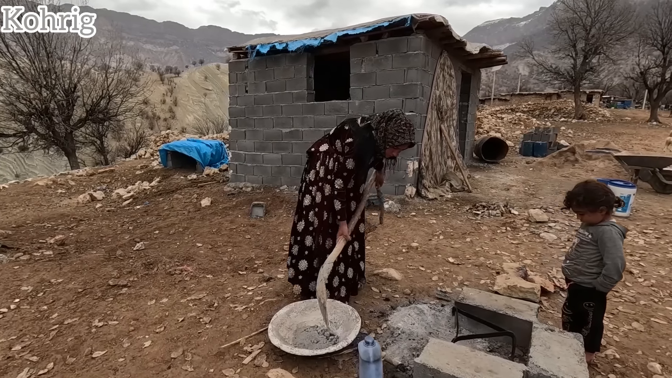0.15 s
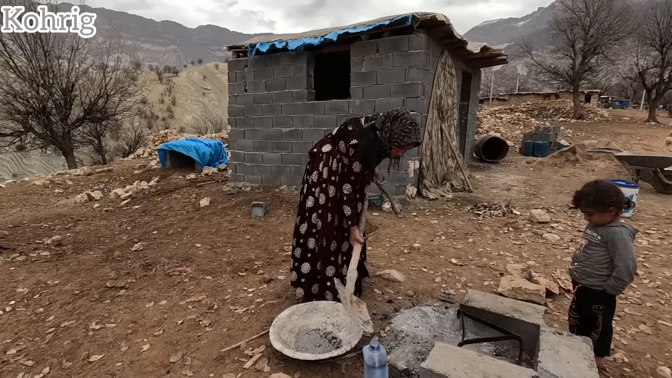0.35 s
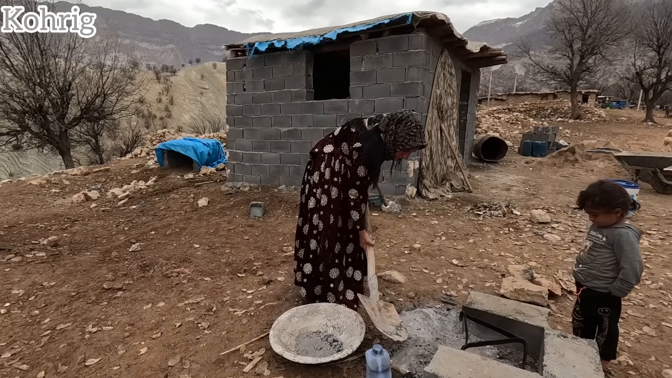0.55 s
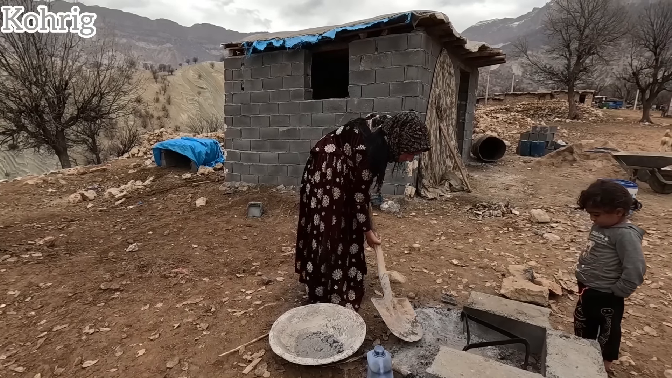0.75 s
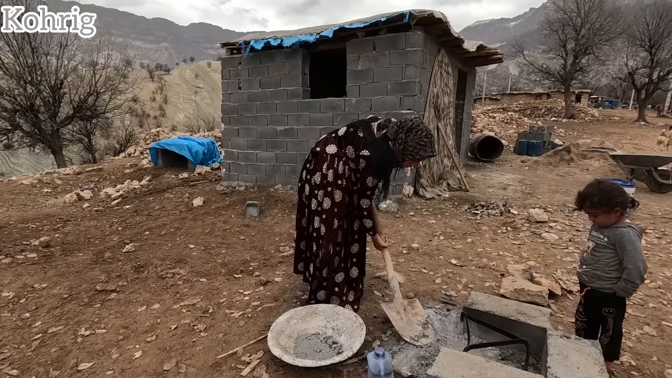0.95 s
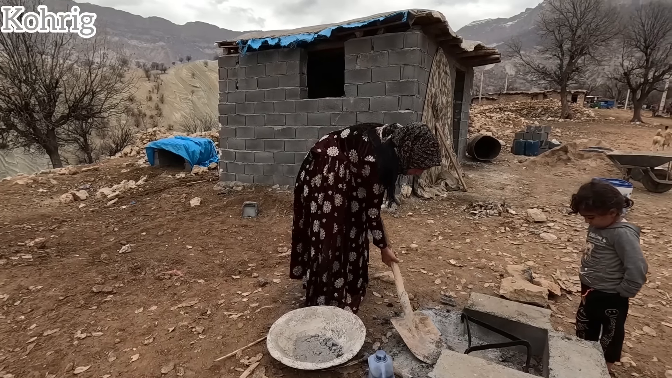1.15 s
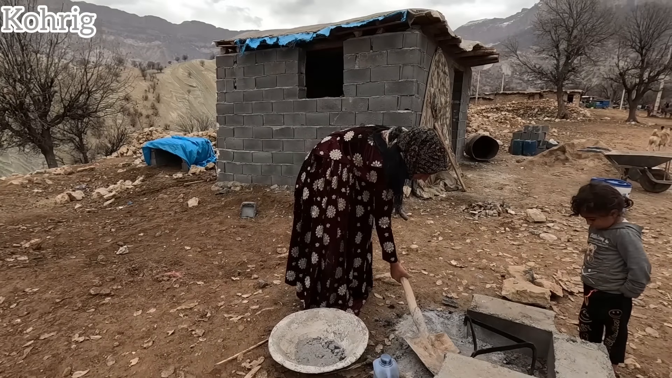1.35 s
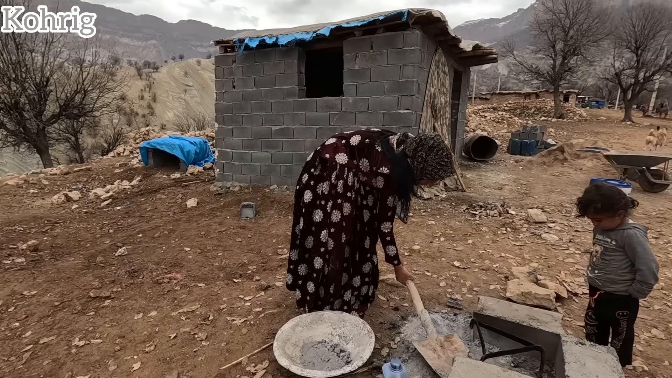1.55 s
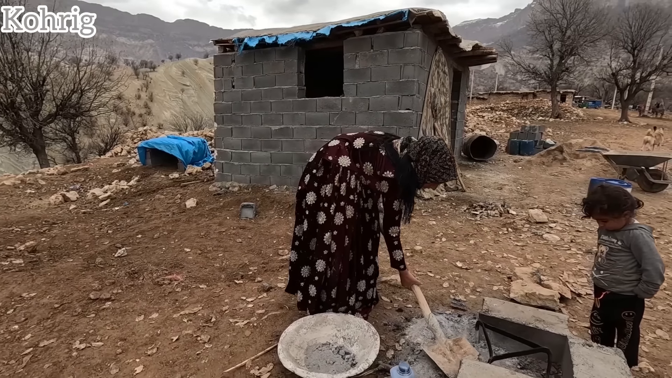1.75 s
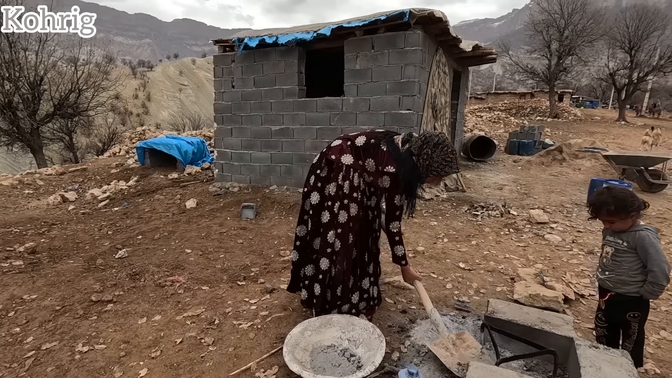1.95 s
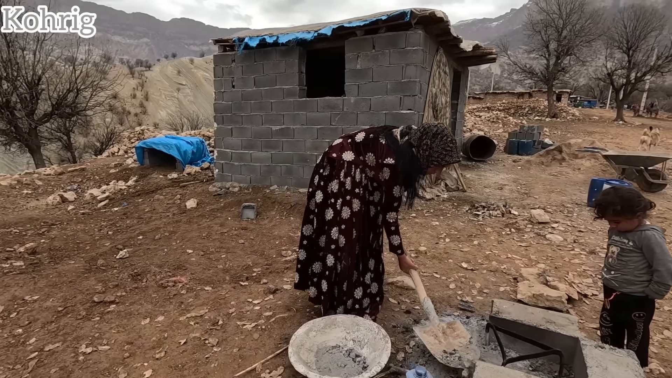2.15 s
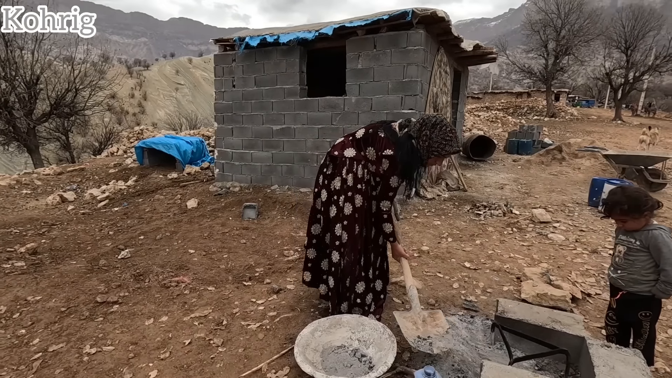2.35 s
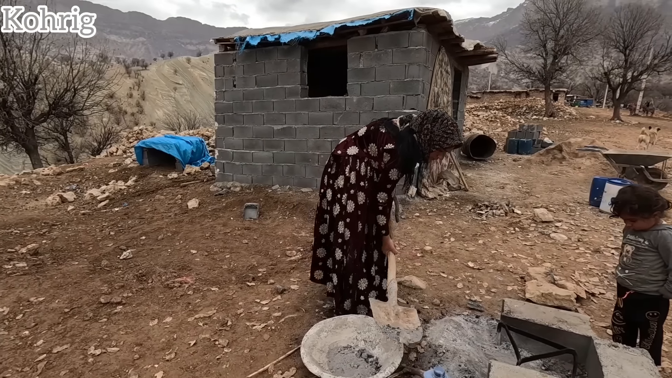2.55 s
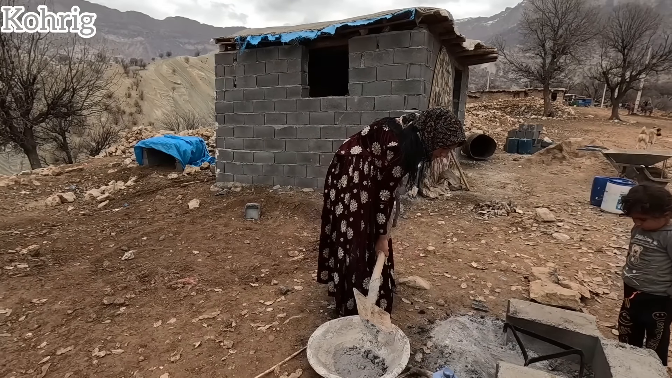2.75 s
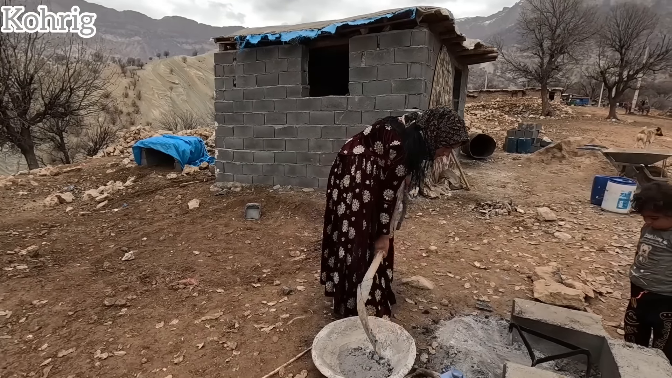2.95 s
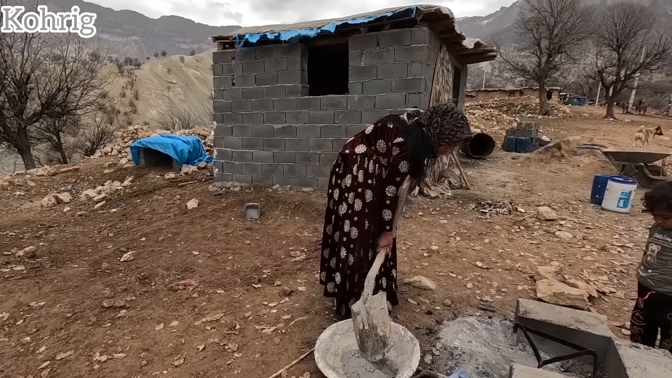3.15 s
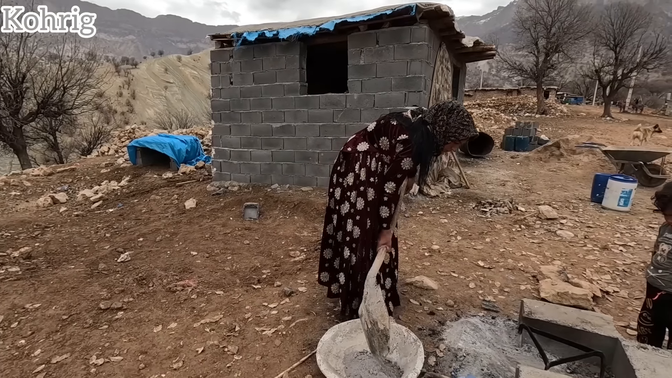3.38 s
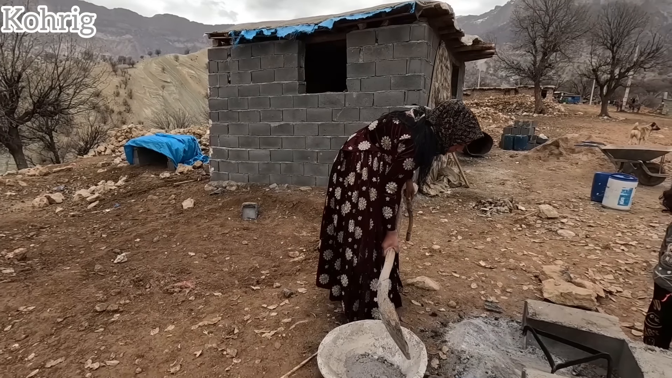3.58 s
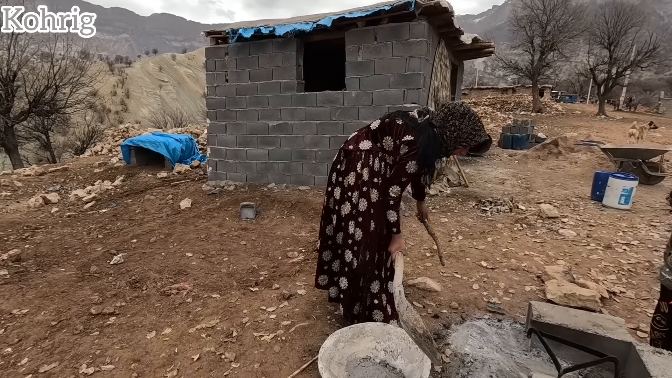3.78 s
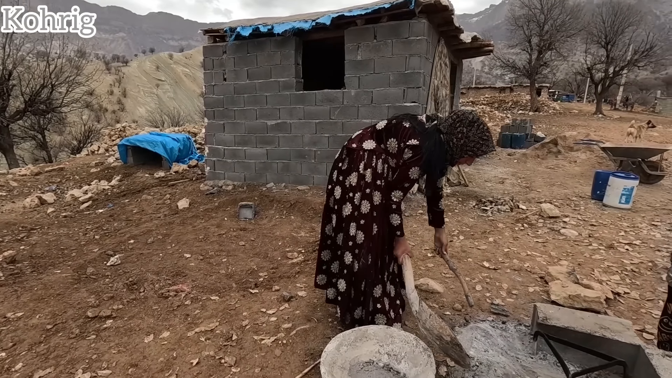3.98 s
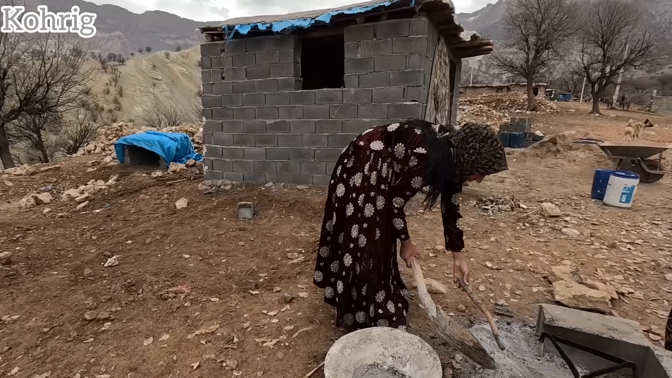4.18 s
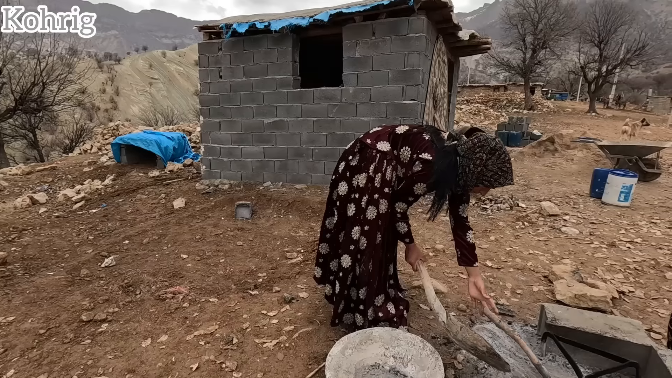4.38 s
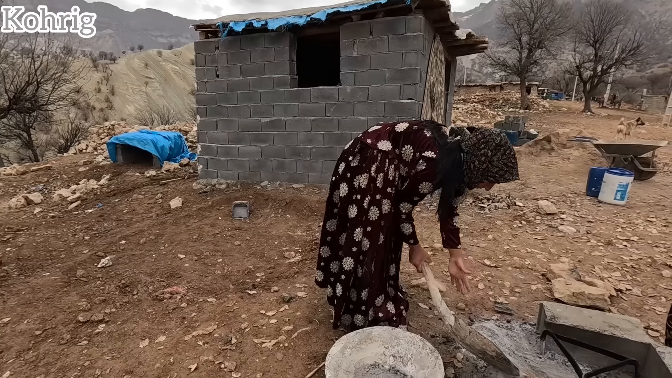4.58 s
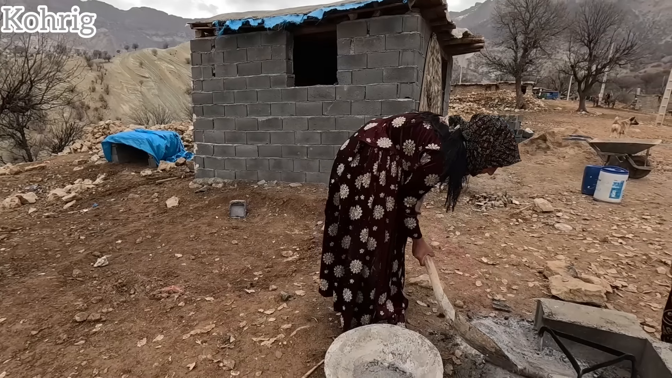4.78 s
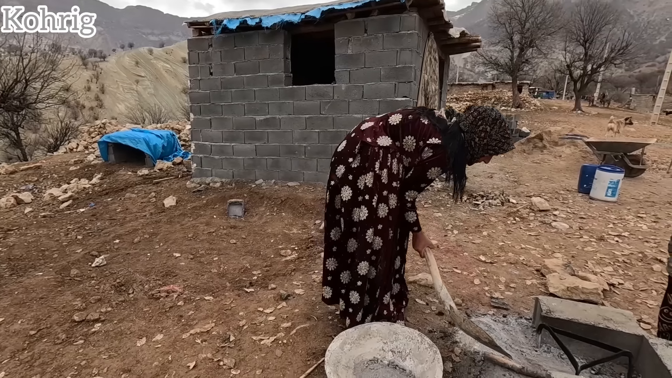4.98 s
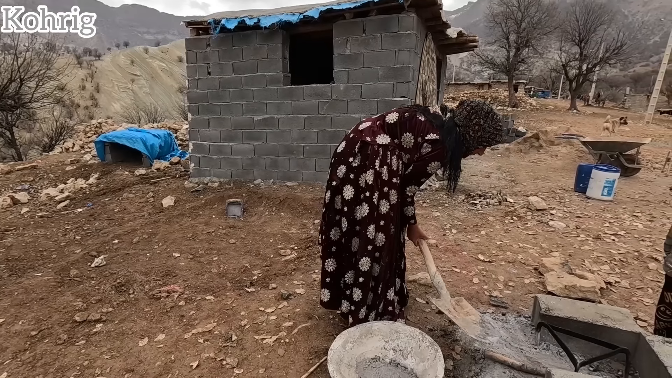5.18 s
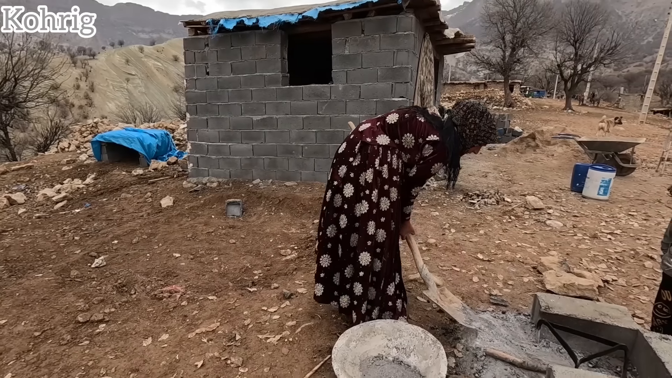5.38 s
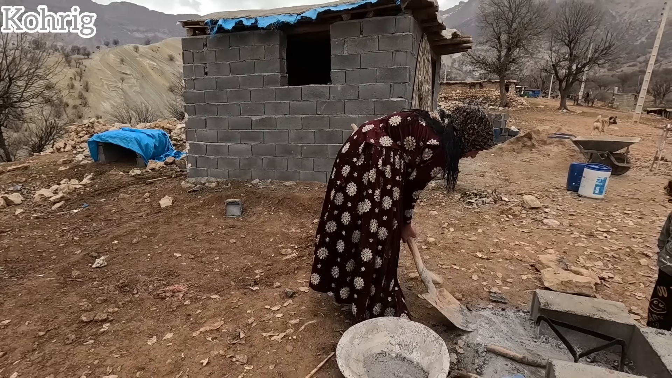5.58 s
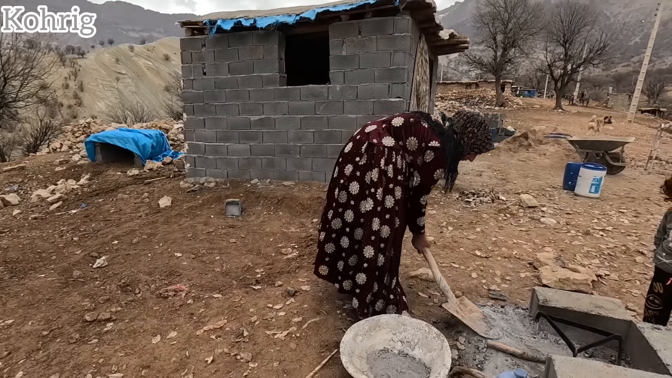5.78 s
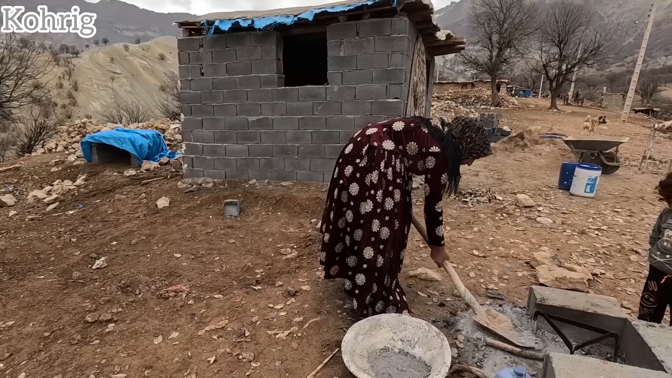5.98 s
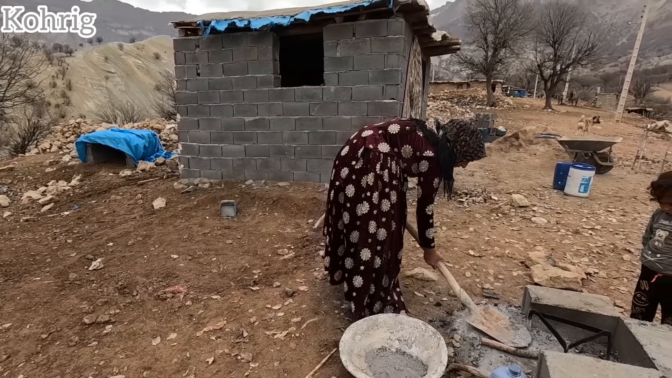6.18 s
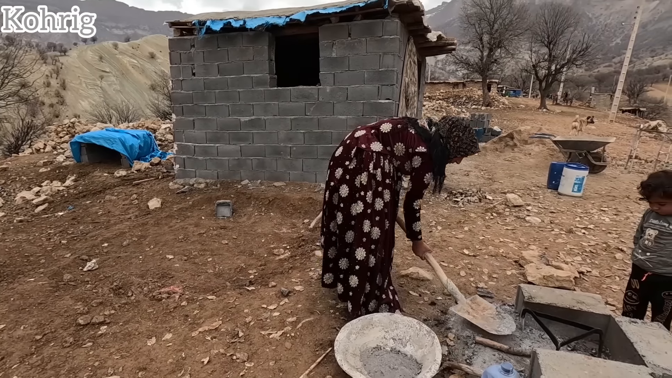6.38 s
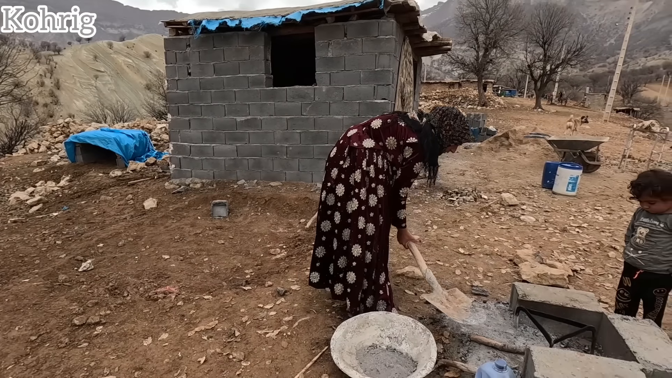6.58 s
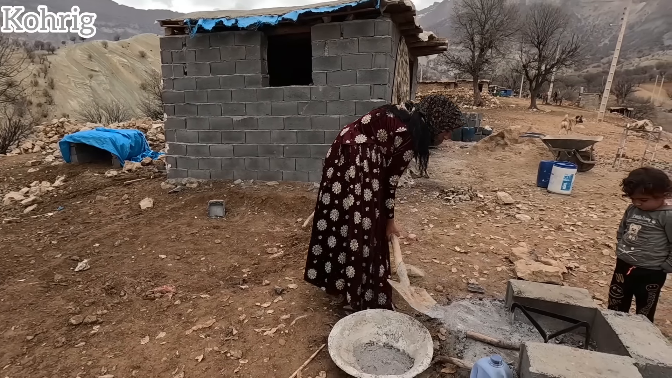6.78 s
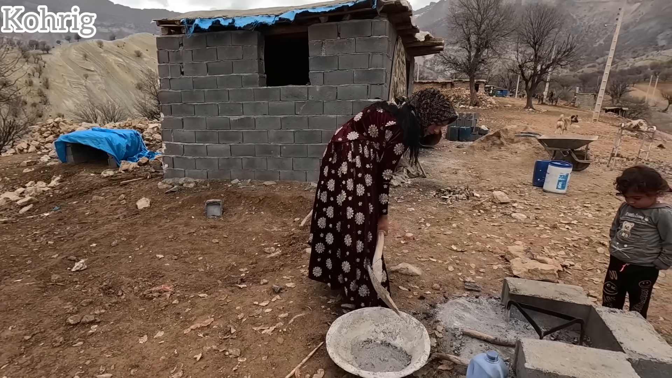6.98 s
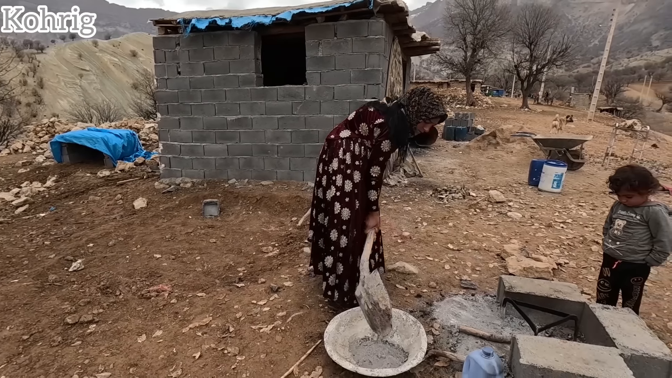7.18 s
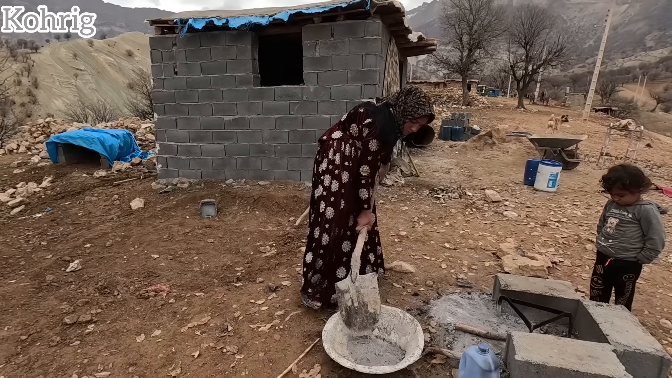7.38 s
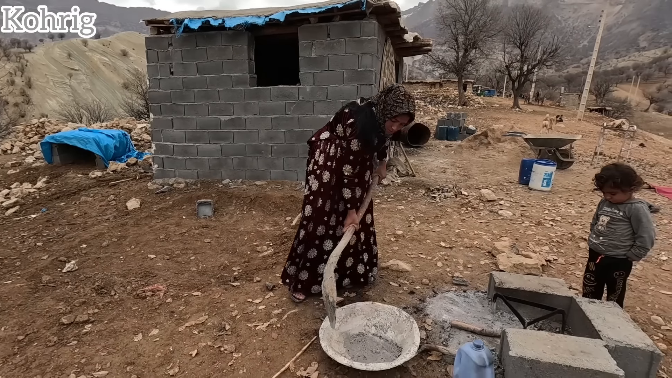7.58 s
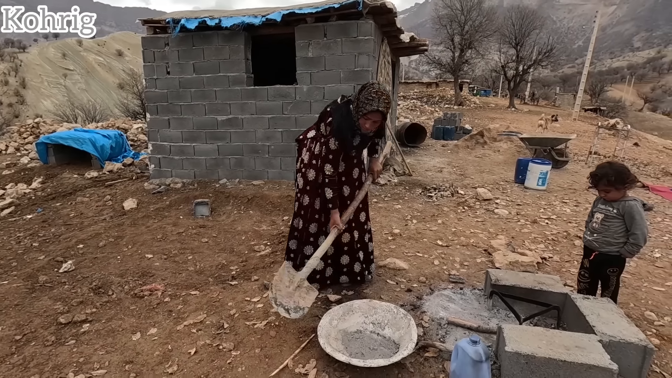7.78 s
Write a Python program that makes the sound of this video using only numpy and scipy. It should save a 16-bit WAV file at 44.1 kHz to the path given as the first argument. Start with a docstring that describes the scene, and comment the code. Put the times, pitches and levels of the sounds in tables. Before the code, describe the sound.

Outdoors in an open yard, a steel shovel knocks lightly, then bites into gritty ash with a rough, rattling scrape. A short pour of ash and cinders patters into a metal basin, followed by light ticks. A hard clank and a second, brighter double scrape come later, then a faint last pour. Low wind rumble, dry rustling and thin far birds sit behind, in a close stereo pickup with wind buffeting the microphone.

```python
"""A steel shovel scrapes gritty ash off a block hearth and tips it into a metal basin, in an open yard.
Random grains ring the blade, hiss as grit and shake the ground; poured cinders patter through basin modes.
Knocks are short rattles through the blade with a bright snap, thumps are decaying low modes with debris.
Behind them a deep drone, wind on the microphone, a rustling hush of shaped noise, and far birds as
gliding sines."""
import sys
import numpy as np
from scipy import signal
from scipy.fft import rfft, irfft, next_fast_len
from scipy.io import wavfile
from scipy.ndimage import uniform_filter1d, map_coordinates

SR = 44100
rng = np.random.default_rng(int(sys.argv[2]) if len(sys.argv) > 2 else 0)


def generate_wav(signal):
    """Clip the signal to [-1, 1] and save it as 16-bit WAV at the path in sys.argv[1]."""
    frames = np.transpose(np.atleast_2d(signal))
    scaled = np.clip(frames, -1, 1) * 32767
    pcm = np.round(scaled).astype(np.int16)
    wavfile.write(sys.argv[1], SR, pcm)


N = 345744  # length in samples

# broad voice of the blade's steel: f/Hz, relative level per Hz/dB
STEEL_VOICE = [(260, -47), (450, -4.5), (850, 2), (1700, 3), (4000, -12.5), (8000, -66)]
# hiss spectrum of the fine grit: f/Hz, relative level per Hz/dB
GRIT_HISS = [(1500, -19), (2600, 6), (4500, -4), (8200, -2.5), (11500, -30.5), (15500, -51.5)]


def amp(db):
    """Gain of a level in dB."""
    return 10 ** (np.asarray(db) / 20)


def unit(x):
    """x at rms 1."""
    return x / np.sqrt(np.mean(x ** 2) + 1e-20)


def along(points, hz):
    """Curve through (Hz, value) points, straight on a log frequency axis."""
    f, v = np.transpose(points)
    return np.interp(np.log(hz + 1), np.log(f + 1), v)


def wobble(rate):
    """A smooth random curve through rate knots a second."""
    knots = rng.standard_normal(int(N * rate / SR) + 4)
    return map_coordinates(knots, [np.arange(N) * rate / SR])


def filtered(x, response):
    """x through a complex response of frequency."""
    m = next_fast_len(x.shape[-1] + 8192)  # spare room for the ringing
    spectrum = rfft(x, m) * response(np.fft.rfftfreq(m, 1 / SR))
    return irfft(spectrum, m)[..., :x.shape[-1]]


def causal(gain):
    """The minimum-phase response with this gain: it never sounds before its blow."""
    c = irfft(np.log(gain + 1e-6))
    c[1:len(c) // 2] *= 2  # fold the cepstrum onto positive time
    c[len(c) // 2 + 1:] = 0
    return np.exp(rfft(c))


def peak(f, hz, width):
    """One resonance of height 1, width in Hz."""
    return 1j * f * width / (hz * hz - f * f + 1j * f * width)


def patchy(x, depth_db, bins, frames):
    """x under a random gain that drifts over frequency and time."""
    z = signal.stft(x, nperseg=256)[2]
    field = rng.standard_normal(z.shape[-2:])
    field = uniform_filter1d(field, size=bins, axis=0)
    field = uniform_filter1d(field, size=frames, axis=1)
    return signal.istft(z * amp(depth_db * unit(field)), nperseg=256)[1][..., :N]


def grains(per_s, spread_db, clumps):
    """Random tiny impacts, many small and a few large, arriving in clumps."""
    hit = rng.random(N) < per_s / SR
    size = np.minimum(rng.exponential(size=N), 3)
    return hit * rng.standard_normal(N) * amp(spread_db * size) * clumps


def gusts():
    """Wind over the breeze in dB: gusts rise, hold and drop."""
    # gusts: start t/s, length/s, level over the breeze/dB
    gust_table = [(5.251, 1.1, 9), (6.774, .75, 5.5)]
    t, edge_s = np.arange(N) / SR, 0.29
    return sum(db * np.clip(np.minimum(t - s, s + length - t) / edge_s + .5, 0, 1)
               for s, length, db in gust_table)


def rush(spectrum, side_db, patchy_db):
    """Stereo noise of rms 1 with patches of random gain; side_db sets its width."""
    pair = patchy(rng.standard_normal((2, N)), patchy_db, bins=3, frames=20)
    mid, side = filtered(pair, lambda f: amp(along(spectrum, f))) * amp([[0], [side_db]])
    return unit(np.array([mid + side, mid - side]))


def air():
    """A deep drone, wind lumps on the microphone, the valley's hush, dry rustling with specks of grit."""
    # slow course of the air: t/s, low hush level/dB, rustle level/dB
    air_levels = [(0, -65.5, -85), (0.3, -74, -74.5), (0.95, -73.5, -80), (2.2, -71.5, -72),
                  (3.1, -72.5, -80), (3.95, -70.5, -72.5), (5.051, -69.5, -73), (5.4, -73.5, -67),
                  (6.449, -78.5, -85.5), (6.9, -71.5, -82.5), (7.35, -70.5, -69), (7.84, -71, -76.5)]
    # wind rumble: f/Hz, relative level per Hz/dB
    rumble_spectrum = [(25, -16.5), (55, 5), (95, -15), (200, -20), (900, -49.5)]
    # low hush: f/Hz, relative level per Hz/dB
    hush_spectrum = [(250, -8), (780, -16), (1200, -11), (1750, -12.5), (4000, -26), (8000, -61)]
    # dry rustle: f/Hz, relative level per Hz/dB
    rustle_spectrum = [(1800, -42.5), (3200, -11), (7300, -2.5), (8600, -8.5), (10600, -29), (15500, -29.5)]
    breeze_db, flutter_db = -65, -12  # flutter level is over the breeze
    flutter_grows = 1.77  # flutter swings wider than the gusts

    s, *cols = np.transpose(air_levels)
    hush_db, rustle_db = [np.interp(np.arange(N) / SR, s, c) for c in cols]

    drone_tone = np.sin(2 * np.pi * np.cumsum(31 + wobble(6.3)) / SR)  # wanders around 31 Hz
    drone = amp(-58.0) * (drone_tone + .5 * unit(wobble(90)))

    gust_db = gusts()
    lumps = amp(3 * wobble(16))
    rumble = unit(lumps * rush(rumble_spectrum, side_db=-1.5, patchy_db=4.0))
    flutter = filtered(rng.standard_normal(N), lambda f: peak(f, 85, 110) ** 3)
    flutter = unit(flutter * amp(4 * wobble(20)))
    wind = amp(breeze_db + gust_db) * rumble
    wind = wind + amp(breeze_db + flutter_db + flutter_grows * gust_db) * flutter

    hush = amp(hush_db + 1.5 * wobble(15)) * rush(hush_spectrum, side_db=-6, patchy_db=1.3)

    specks = filtered(grains(30, 4.1, 1), lambda f: causal(amp(along(rustle_spectrum, f))))
    rustle = rush(rustle_spectrum, side_db=-14.5, patchy_db=1.5) + .33 * unit(specks)
    return drone + wind + hush + amp(rustle_db + 1.6 * wobble(12.0)) * rustle


def birds():
    """Thin whistles from far off: sines that glide fast at first, then settle on their last pitch."""
    # far calls: start t/s, length/s, first f/Hz, last f/Hz, level/dB
    far_calls = [(0.23, 0.27, 4500, 5570, -73.5), (0.25, 0.23, 6600, 7250, -68.5),
                 (0.72, 0.12, 7050, 5900, -69), (2.983, 0.26, 3460, 3420, -71.5),
                 (6.705, 0.072, 6500, 6250, -68.5), (6.8, 0.31, 1300, 1196, -67.5),
                 (6.841, 0.14, 1737, 1710, -64.5), (7.688, 0.16, 1700, 1573, -60.5)]
    out, waver = np.zeros(N + SR), np.pad(wobble(400), (0, SR))
    for s, length, first_hz, last_hz, db in far_calls:
        u = np.linspace(0, 1, int(length * SR))
        start = round(s * SR)
        pitch = last_hz + (first_hz - last_hz) * (1 - u) ** 2
        blur = min((last_hz / 2600) ** 2, 1)  # high notes arrive blurred
        shimmer = 1 - blur + blur * waver[start:][:len(u)]
        whistle = np.sin(2 * np.pi * np.cumsum(pitch) / SR)
        out[start:][:len(u)] += amp(db) * shimmer * np.sin(np.pi * u) * whistle
    return out[:N]


def yard(x, t60=.09):
    """Blocks and the hut wall scatter a short, separate answer to each side: decaying noise tails."""
    t = np.arange(SR // 5) / SR
    tail = rng.standard_normal((2, len(t))) * amp(-60 * t / t60) * (t > .003)
    return signal.fftconvolve(x[None], tail / np.linalg.norm(tail[0]), axes=1)[:, :N]


def thumps():
    """A blunt blow wakes the low modes nearest its own pitch; loose debris rattles after it."""
    # blunt blows on the ground: t/s, level/dB, centre f/Hz
    ground_blows = [(1.806, -30.5, 182.3), (4.563, -48.5, 298), (4.621, -31.5, 437), (4.691, -42.5, 178.7),
                    (6.294, -28.5, 52), (7.369, -42.5, 55.5)]
    # modes of ground and handle: f/Hz, relative level/dB, t60/s
    earth_modes = [(53.5, 5.5, 0.22), (141, 2, 0.22), (199, 15, 0.036), (298, 9, 0.07), (422, 4.5, 0.16)]
    out, t = np.zeros(N + SR), np.arange(SR // 2) / SR
    for s, db, centre_hz in ground_blows:
        notes = 0
        for hz, level, t60 in earth_modes:
            octaves_off = np.abs(np.log2(hz / centre_hz))
            unsteady = hz / 400 * wobble(60)[:len(t)]  # phase wander, rad
            decay = amp(level - 11 * octaves_off - 60 * t / t60)
            notes = notes + decay * np.sin(2 * np.pi * hz * t + unsteady)

        debris = rng.standard_normal(len(t)) * (rng.random(len(t)) < .015)
        root = centre_hz ** .5
        debris = unit(filtered(debris, lambda f: peak(f, 50 * root, 110 * root) ** 3))
        debris = debris * amp(-60 * t / (0.41 * amp(0.3 * db)))  # harder blows rattle longer

        rise = 1 - np.exp(-t * centre_hz * 6)  # deep blows land softly
        out[round(s * SR):][:len(t)] += amp(db) * rise * (notes + centre_hz / 420 * debris)
    return out[:N]


def modes(f):
    """The plate modes of the blade, alternating in sign, under one wide resonance."""
    # plate modes: f/Hz, width/Hz, relative level/dB
    plate_modes = [(680, 99, -11.5), (1107, 130, -4.5), (1613, 61, -15), (2010, 31, -16.5),
                   (2663, 90, -13.5), (3560, 110, -22.5), (5260, 60, -21)]
    plate = sum(amp(db) * (-1) ** k * peak(f, hz, w) for k, (hz, w, db) in enumerate(plate_modes))
    return peak(f, 2500, 5400) ** 2 * plate


def blade(f, ring_db=6):
    """Short-lived plate modes standing out of the broad voice of the steel."""
    return amp(along(STEEL_VOICE, f)) + amp(ring_db) * np.abs(modes(f))


def knocks():
    """Each blow is a rattle in the blade around its own pitch, under a short bright snap."""
    # cinders and stones striking the blade: t/s, rattle peak level/dB, f/Hz, snap level before a lift/dB
    blade_blows = [(0.035, -35.5, 1440, -63), (0.13, -58.5, 1540, -62.5), (0.856, -59.5, 3600, -77),
                   (1.041, -32.5, 1040, -55.5), (1.155, -28, 950, -58), (1.222, -20, 688, -46),
                   (1.269, -16, 1000, -41), (1.331, -25, 1270, -46.5), (1.450, -33, 714, -44.5),
                   (1.806, -24.5, 614, -59), (1.834, -51, 3100, -66.5), (1.867, -37.5, 1003, -69),
                   (1.9, -41, 1198, -60.5), (2.211, -52, 1146, -75), (2.345, -54, 1130, -62),
                   (2.405, -57.5, 2840, -51), (2.939, -46, 1170, -69.5), (3.287, -23, 3620, -44.5),
                   (3.317, -36, 3320, -58), (3.371, -37.5, 1427, -64), (3.4, -45, 2100, -57.5),
                   (3.473, -46, 1405, -67), (3.754, -41.5, 2030, -62), (3.818, -51, 3360, -66.5),
                   (4.44, -52, 1930, -70), (4.56, -40.5, 400, -63), (4.619, -11.5, 1450, -41),
                   (4.773, -62, 2980, -67), (4.817, -55.5, 1340, -64.5), (5.08, -45.5, 2210, -73.5),
                   (5.722, -49.5, 612, -57.5), (5.788, -30.5, 2920, -50), (5.882, -24, 1130, -50),
                   (5.897, -14, 3650, -39.5), (6.018, -18.5, 760, -37.5), (6.048, -13.5, 852, -42.5),
                   (6.162, -39.5, 1456, -68), (6.255, -39.5, 877, -71), (6.803, -55, 3400, -76.5),
                   (7.252, -49, 1393, -84.5), (7.29, -50.5, 3240, -71.5), (7.381, -48.5, 702, -73.5),
                   (7.433, -46.5, 1340, -61.5), (7.515, -51.5, 4000, -64)]
    snap_lift_db = 20.5
    out, t = np.zeros(N + SR), np.arange(SR // 5) / SR
    for s, db, hz, snap_db in blade_blows:
        hard = amp(.06 * db)  # a harder blow lasts longer and wakes more of the blade
        t60 = np.array([[0.059 * hard], [.02]])  # of rattle and snap, s
        envelopes = amp(-60 * t / t60) * (1 - np.exp(-t / 0.00073))
        rattle, snap = rng.standard_normal((2, len(t))) * envelopes

        body = filtered(rattle, lambda f: causal(blade(f)) * peak(f, hz, hard * hz) ** 2)
        body = body / np.abs(body).max()
        # a light tap leaves its note ringing; high notes die sooner
        ring = amp(-24.5 - 0.34 * db - 60 * t * hz / 100) * np.sin(2 * np.pi * hz * t)

        snap_hz = 6500 * amp(0.19 * (snap_db - db + 8.5))  # light specks tick higher than heavy stones
        snap = filtered(snap, lambda f: causal(amp(along(GRIT_HISS, f))) * peak(f, snap_hz, 5000) ** 2)
        snap = amp(snap_db + snap_lift_db) * snap / np.abs(snap).max()
        out[round(s * SR):][:len(t)] += amp(db) * (body + ring) + snap
    return out[:N]


def grit(clumps):
    """The hiss of fine ash grains: dense tiny impacts through the grit's bright spectrum."""
    fine = grains(7000, 4, clumps)
    return unit(filtered(fine, lambda f: causal(amp(along(GRIT_HISS, f)))))


def flow(swells_db_s):
    """Gain of the falling ash: it swells to its thickest moment, then thins out."""
    # ash sliding into the basin: thickest t/s, level/dB, thinning/(dB/s)
    ash_pours = [(0.043, -46.5, 441), (3.294, -36.5, 204), (7.449, -49.5, 346)]
    t = np.arange(N) / SR
    return sum(amp(db - np.maximum(swells_db_s * (s - t), thins * (t - s))) for s, db, thins in ash_pours)


def pour():
    """Fine ash runs ahead, then cinders patter on the basin's thin wall, which has no bass."""
    # basin wall resonances: f/Hz, width/Hz, relative level/dB
    basin_modes = [(953.4, 24.4, 8.5), (1296, 400, 1), (3320, 1000, -1.5)]
    clumps = amp(3.5 * wobble(90))

    def wall(f):
        return sum(amp(db) * (-1) ** k * peak(f, hz, w) for k, (hz, w, db) in enumerate(basin_modes))

    patter = unit(filtered(grains(1500, 3.7, clumps), lambda f: wall(f) * peak(f, 1330, 1700)))
    ash = amp(-10) * grit(clumps)
    return flow(swells_db_s=579) * patter + flow(swells_db_s=257) * ash  # the slower swell starts earlier


def pressure():
    """Gains per sample of blade, grit, ground and ringing; silent between pushes."""
    # pressure of the edge, one list a push: t/s, level of the blade/dB
    pushes = [
        [(1.03, -57), (1.07, -36), (1.13, -38), (1.16, -30.5), (1.26, -34.5), (1.34, -32), (1.39, -34),
         (1.445, -31), (1.49, -46.5)],
        [(1.6, -61.5), (1.63, -57), (1.685, -58), (1.71, -67)],
        [(5.73, -56), (5.775, -73.5), (5.79, -43), (5.83, -29.5), (5.87, -26), (5.895, -24.5), (5.91, -31),
         (5.94, -33.5)],
        [(5.95, -38), (5.975, -29), (6.005, -25.5), (6.03, -30), (6.05, -28.5), (6.065, -31.5), (6.08, -44.5),
         (6.11, -55.5), (6.22, -73)],
    ]
    # as the blade fills, grit and ground drift against it; one row a push, all relative to the blade:
    # grit at start/dB, grit at end/dB, ground at start/dB, ground at end/dB, ringing/dB
    filling_levels = [(-8, -11.5, -24.5, -5, -5), (-3.5, -11, -24, -8, -10), (6, -17, -7.5, -17.5, -0.5),
                      (-3, -16, -21.5, -1.5, -2)]
    level, t = 0, np.arange(N) / SR
    for rows, (grit_0, grit_1, ground_0, ground_1, ring) in zip(pushes, filling_levels):
        s, db = np.transpose(rows)
        on = np.interp(t, [s[0] - .01, s[0], s[-1], s[-1] + .01], [0, 1, 1, 0])
        ends = [(0, 0), (grit_0, grit_1), (ground_0, ground_1), (ring, ring)]
        drift = np.array([np.interp(t, [s[0], s[-1]], pair) for pair in ends])
        level = level + on * amp(np.interp(t, s, db) + drift)
    return level


def scrape():
    """Grit catches under the edge: coarse grains ring the blade and shake the ground, fine ones hiss."""
    # ground under the blade: f/Hz, relative level per Hz/dB
    ground_spectrum = [(60, -49.5), (160, -5), (400, 0), (700, -13), (1500, -54.5)]
    judder = amp(1.8 * wobble(80) + 2.4 * wobble(220))  # the edge sticks and slips
    coarse = grains(1700, 2.3, judder)
    steel = filtered(coarse, lambda f: causal(amp(along(STEEL_VOICE, f))))
    steel = patchy(steel, depth_db=4, bins=3, frames=7)  # load and contact point keep shifting its colour
    ringing = patchy(filtered(coarse, modes), depth_db=4, bins=2, frames=20)
    ground = filtered(coarse, lambda f: causal(amp(along(ground_spectrum, f))))
    layers = [unit(steel), grit(judder), unit(ground), unit(ringing)]
    return np.sum(pressure() * layers, axis=0)


def scene():
    """All sources, the shovel in front of the yard's echoes."""
    shovel = scrape() + pour() + knocks()
    return shovel + amp(-10.0) * yard(shovel) + thumps() + birds() + air()


def record(dry):
    """The right microphone port hears a little sooner and mostly louder; the top of the band is cut off."""
    # the microphone ports: f/Hz, left over right level/dB, left lag/rad
    port_lean = [(55, -4.5, 0), (200, 0, .1), (1000, -1.8, .45), (3000, -.8, .8), (8000, -.3, .4)]
    top_hz = 15700
    hz, db, lag = np.transpose(port_lean)
    half = np.array([[.5], [-.5]])  # each port takes half the difference

    def ports(f):
        gain = amp(half * along(np.c_[hz, db], f))
        return gain * np.exp(-1j * half * along(np.c_[hz, lag], f))

    return filtered(dry, lambda f: ports(f) * (f < top_hz))


dry = scene()
out = record(dry)
generate_wav(out)
```